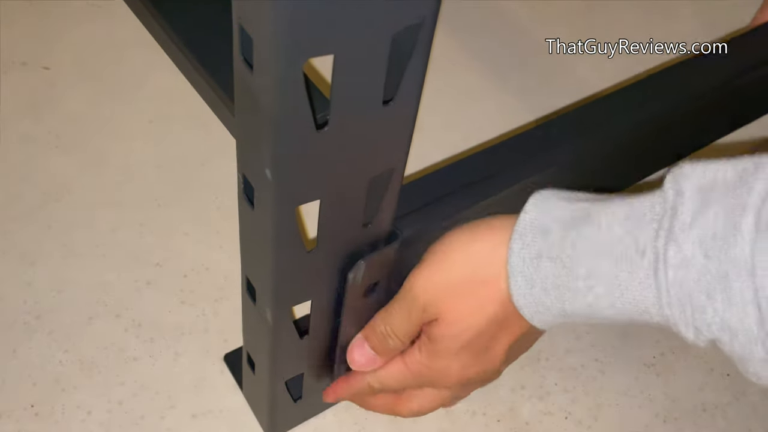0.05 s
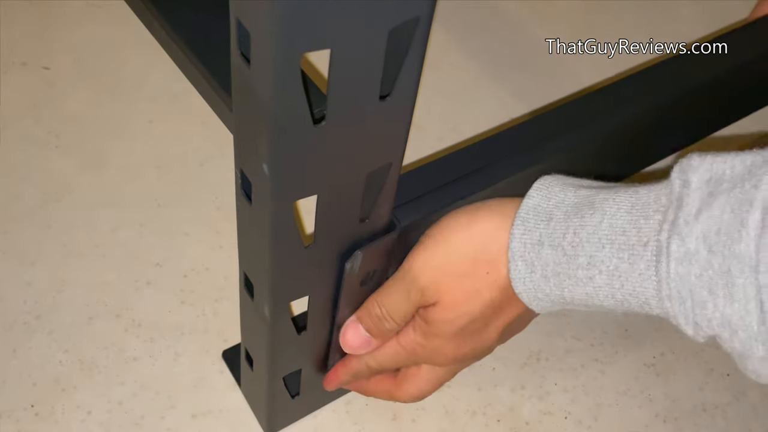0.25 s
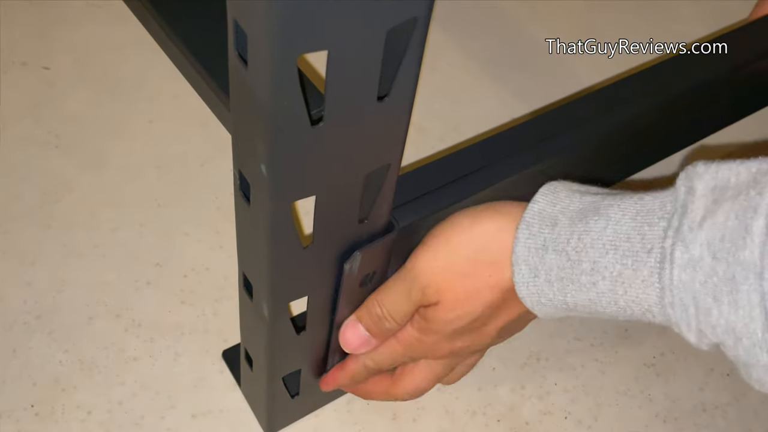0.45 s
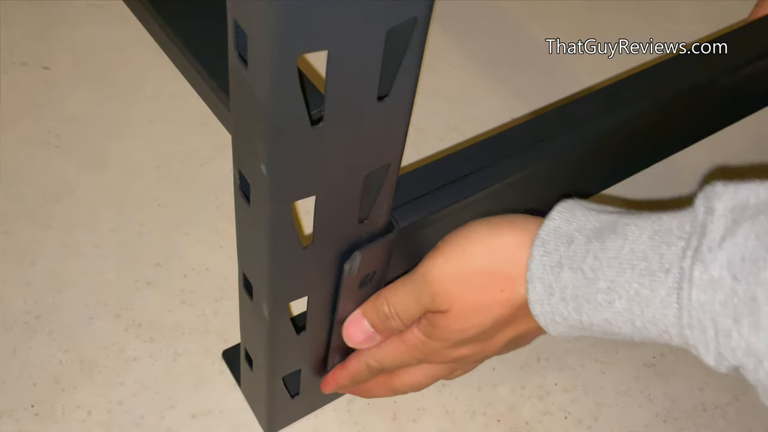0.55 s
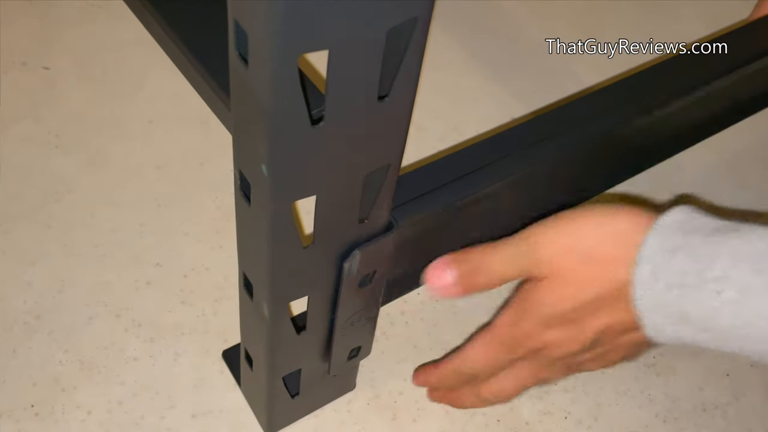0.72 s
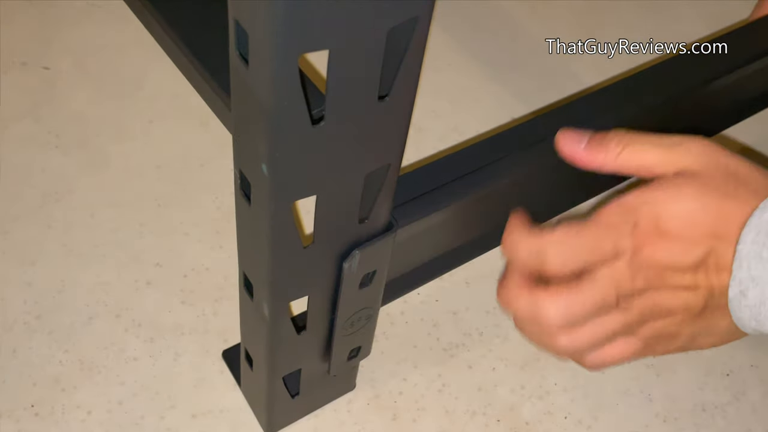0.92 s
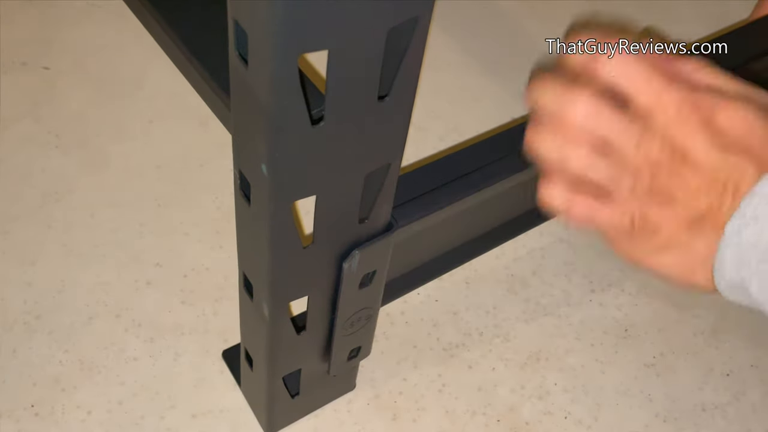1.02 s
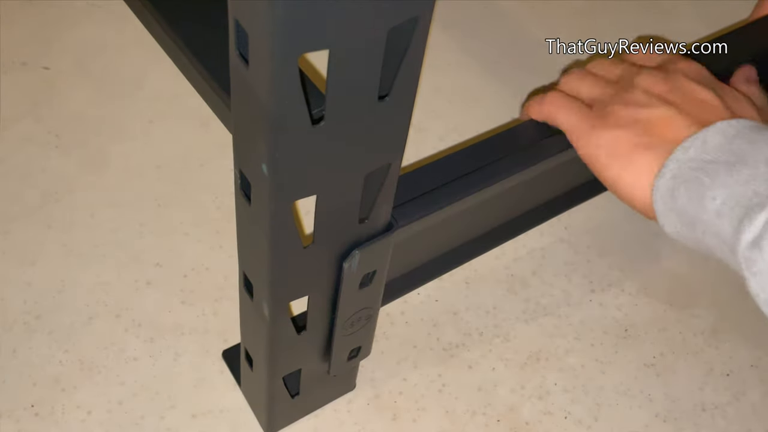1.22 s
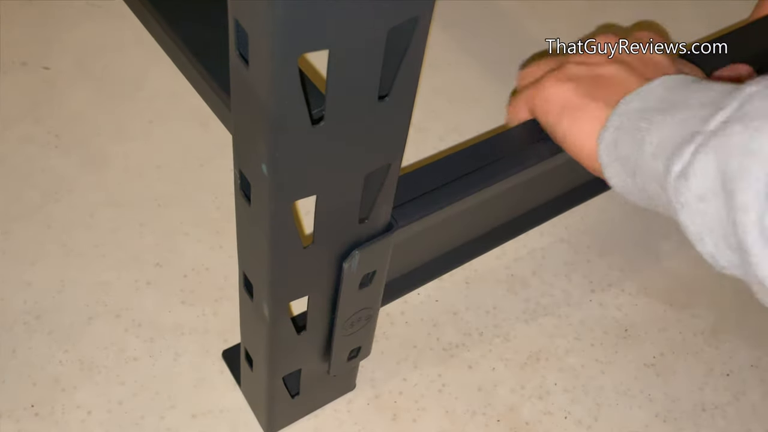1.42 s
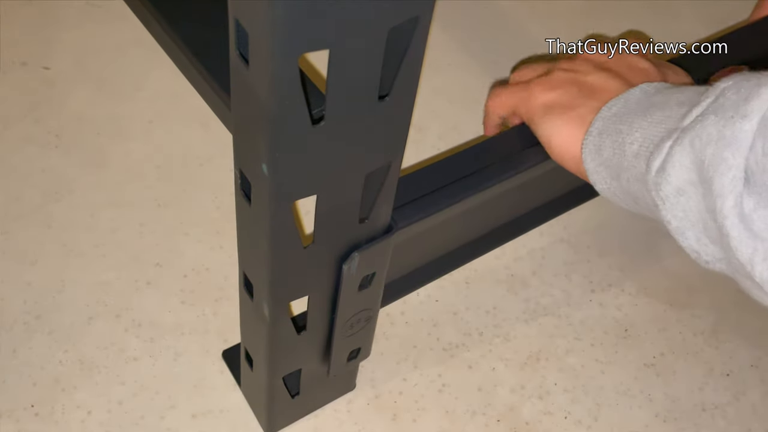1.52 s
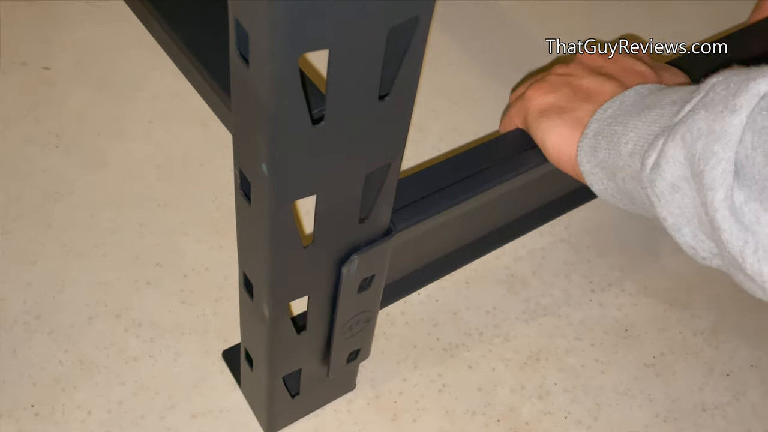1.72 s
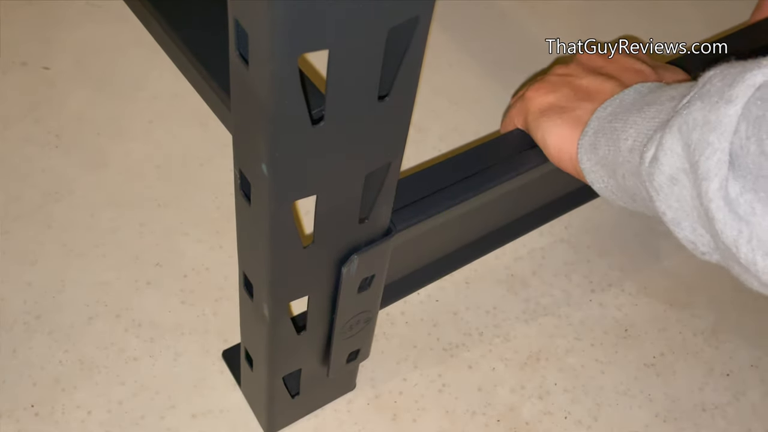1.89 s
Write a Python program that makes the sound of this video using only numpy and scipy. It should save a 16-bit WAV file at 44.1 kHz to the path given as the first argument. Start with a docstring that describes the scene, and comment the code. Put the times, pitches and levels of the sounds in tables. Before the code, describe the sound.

One loud metal clang from a steel rack, ringing out as a hand settles on it.

```python
"""A steel shelf beam clangs as a hand knocks it into its upright in a garage: a few strong, beating
modes ring over hundreds of weaker ones from the thin-walled rack, and the joint cracks and chatters.
While the clang rings on, the hand lands on the beam and leans on it, a sleeve rustles and the rack
booms softly. A faint rumble and the echo of the garage lie behind."""
import sys
import numpy as np
from scipy import signal
from scipy.fft import rfft, irfft
from scipy.io import wavfile
from scipy.ndimage import uniform_filter1d

SR = 44100
rng = np.random.default_rng(int(sys.argv[2]) if len(sys.argv) > 2 else 0)


def store_pcm(level_fs):
    """Save levels as 16-bit WAV."""
    pcm = np.round(np.clip(level_fs, -1, 1) * 32767).astype(np.int16)
    wavfile.write(sys.argv[1], SR, np.atleast_2d(pcm).T)


N = 85995
T = np.arange(N) / SR
F = np.maximum(np.fft.rfftfreq(N, 1 / SR), 1)
KNOCK_S = 0.2063
WIDTH_HZ = 260  # channels drift apart above this


def undb(db):
    """Decibels to gain."""
    return 10 ** (np.asarray(db) / 20)


def at(table, hz, column=1):
    """Table column interpolated over log frequency."""
    rows = np.array(table, float)
    return np.interp(np.log(hz), np.log(rows[:, 0]), rows[:, column])


def pan(db):
    """Stereo gains for an L-R level difference."""
    return undb(np.array([[db], [-db]]) / 2)


def decay(start_s, t60_s):
    """Exponential decay from a start time."""
    return (T >= start_s) * np.exp(-np.log(1000) * np.maximum(T - start_s, 0) / t60_s)


def swell(peak_s, rise_s, fall_s):
    """Asymmetric Gaussian envelope."""
    return np.exp(-((T - peak_s) / np.where(T < peak_s, rise_s, fall_s)) ** 2)


def noise(colour, width=0.91):
    """Coloured stereo noise, rms 1, near mono in the bass."""
    mid, side = rfft(rng.standard_normal((2, N)))
    stereo = mid + width * F / (F + WIDTH_HZ) * side * np.array([[1], [-1]])
    x = irfft(stereo * undb(at(colour, F)), N)
    return x / x.std()


def convolve(x, response):
    """Per-channel convolution, cut to N."""
    return signal.fftconvolve(x, response, axes=1)[:, :N]


def ring(hz, t60_s, spread_rad):
    """One struck mode: a damped complex wave with random L-R phase."""
    t = T[:int(min(t60_s * SR, N))]
    phase = 2 * np.pi * rng.random() + spread_rad * rng.standard_normal() * np.array([[1], [-1]]) / 2
    return np.exp(1j * phase) * np.exp((2j * np.pi * hz - np.log(1000) / t60_s) * t)


# Beam modes: f/Hz, level/dB, t60/s, L-R/dB, partner offset/Hz, partner ratio (negative: antiphase)
BEAM_MODES = [(139.46, -42.5, 1.7, -3.5, 4.5, 1.4), (549.4, -40.5, 1.61, -3.5, 6.5, .5),
              (594, -38.5, 0.73, 1, 9, 0.24), (757, -52, 2.54, -14, 4, 0.62),
              (839.3, -39, 1.51, -12, 4.5, -0.28), (861, -31.5, 0.78, 2, 7.5, 1.5),
              (924, -46.5, 2.9, 8, 3.5, -1.3), (1026, -41.5, 2.3, 12, -5, 0.79),
              (1112.6, -31, 3.1, 5, -3.5, .9), (1166, -45.5, 3.36, 4, 7, 0.53),
              (1385, -50, 3.6, -2, 5.5, -.9), (1557, -52, 3.5, 9, 9.5, 0.093),
              (1601, -41.5, 2.06, 5, 2.5, -.9), (1720, -44.5, 1.54, 3, -4.5, 1),
              (2141, -44, 1.2, -1, -30.5, 1.4), (2673, -41, 0.94, 1, 9, 1.7),
              (3021, -42.5, .55, -8, 18, -0.16)]


def beam(partner_t60_ratio=0.57):
    """Strong beam modes build up, waver and beat, each against a shorter-lived partner."""
    tones = np.zeros((2, N))
    for hz, db, t60, pan_db, beat_hz, partner in BEAM_MODES:
        build_s = 0.027 * (t60 / 2.5) ** 2  # brief modes speak at once
        build = 1 - np.exp(-T / build_s)
        beat_t60 = t60 * partner_t60_ratio / (1 - partner_t60_ratio)
        beating = 1 + partner * np.exp(2j * np.pi * beat_hz * T) * decay(0, beat_t60)
        wave = ring(hz, t60, spread_rad=1.264)
        n = wave.shape[1]
        envelope = (build * beating * waver())[:, :n]
        tones[:, :n] += undb(db) * pan(pan_db) * (wave * envelope).imag
    return tones


def waver(depth=0.24, corner_hz=25, knots_per_s=40):
    """Slow random drift of a tone's level and phase, per channel."""
    spectrum = rfft(rng.standard_normal((2, 2, int(N / SR * knots_per_s))))
    hz = np.arange(spectrum.shape[-1]) * SR / N
    real, imag = irfft(spectrum / (1 + (hz / corner_hz) ** 2), N)
    return 1 + depth * (real + 1j * imag) / real.std()


def knock_and_damp(tones, loss_db_per_s=2.5):
    """Tones start at the knock and decay faster once the palm lies on the beam."""
    struck = np.pad(tones, ((0, 0), (int(KNOCK_S * SR), 0)))[:, :N]
    palm_s = PALM_CONTACTS[-1][0]
    return struck * undb(-loss_db_per_s * np.maximum(T - palm_s, 0))


# Wall mode envelope: f/Hz, relative level per kHz/dB, t60/s
WALL_MODES = [(181.6, -34.5, 2.9), (357, -38.5, 2.18), (713, -32, 1.47), (1050, -23, 1.16),
              (1450, -34, 1.55), (2270, -30, 0.87), (3404, -28, 0.58), (3420, -43.5, 0.72),
              (5280, -34.5, 0.53), (5630, -48, 0.37), (7180, -41, 0.37), (8047, -81.5, 0.93)]


def rack_walls(count=900):
    """Dense modes of the thin steel walls, driven by the blow."""
    edges_hz = np.linspace(np.sqrt(WALL_MODES[0][0]), np.sqrt(WALL_MODES[-1][0]), count + 1) ** 2
    modes = np.zeros((2, N))
    for low_hz, gap_hz in zip(edges_hz, np.diff(edges_hz)):
        hz = low_hz + gap_hz * rng.random()
        life, side = rng.standard_normal(size=2)
        width = hz / (hz + WIDTH_HZ)
        gain = undb(at(WALL_MODES, hz)) * np.sqrt(gap_hz / 1000)
        t60 = at(WALL_MODES, hz, column=2) * np.exp(0.16 * life)
        wave = ring(hz, t60, spread_rad=2.3 * width).imag
        modes[:, :wave.shape[1]] += gain * pan(width * (7 + 4 * side)) * wave
    return undb(-0.5) * convolve(modes, blow())


def blow(chatter_db=-9.5, mean_delay_s=0.0063):
    """Unit-energy force: the knock, then six impulses of joint chatter."""
    force = np.zeros((1, N))
    force[0, int(KNOCK_S * SR)] = 1
    for delay_s, size in zip(rng.exponential(mean_delay_s, size=6), rng.standard_normal(size=6)):
        force[0, int((KNOCK_S + delay_s) * SR)] += size * undb(chatter_db)
    return force / np.sqrt(np.sum(force ** 2))


# Whole-rack modes: f/Hz, level/dB, t60/s
SWAY_MODES = [(56.5, -65.5, 6.1), (207.1, -48.5, 4.35), (279.3, -56.5, 3.3), (330.4, -51.5, 2.56),
              (423.5, -50.5, 2.92)]


def rack_sway():
    """The whole rack sways in low, long-lived modes."""
    tones = np.zeros((2, N))
    for hz, db, t60 in SWAY_MODES:
        wave = ring(hz, t60, spread_rad=0).imag
        tones[:, :wave.shape[1]] += undb(db) * wave
    return tones


# Crack spectrum: f/Hz, relative level/dB
CRACK_SPECTRUM = [(50, -18), (100, 14.5), (300, 0.5), (900, 2.5), (3000, -5.5), (6500, -9), (8500, -27.5),
                  (10500, -16), (15000, -26.5)]
# Hiss spectrum of snap, ticks and rubs: f/Hz, relative level/dB
HISS_SPECTRUM = [(2000, -51.5), (6500, -1), (8600, -15), (10000, 2.5), (13300, 3), (15500, 1.5)]
# Settling ticks: t/s, level/dB
JOINT_TICKS = [(0.411, -60.5), (0.465, -57.5), (0.557, -60), (1.565, -50.5)]


def joint():
    """Steel hits steel with a crack and a bright snap; the joint ticks as it settles."""
    crack = undb(-26.5) * noise(CRACK_SPECTRUM, width=0.49) * decay(KNOCK_S, t60_s=0.27) * pan(0.99)
    snap = undb(-45) * decay(KNOCK_S, t60_s=0.16)
    ticks = sum(undb(db) * decay(s, t60_s=0.036) for s, db in JOINT_TICKS)
    return crack + noise(HISS_SPECTRUM, width=0.41) * (snap + ticks)


# Palm contacts: t/s, level/dB
PALM_CONTACTS = [(1.249, -54.5), (1.255, -48.5)]
# Pat spectrum: f/Hz, relative level/dB
PALM_SPECTRUM = [(50, -19), (115, 4.5), (220, -5), (370, 1), (700, 1), (1000, -12), (2500, -17.5),
                 (4800, -19.5), (7000, -55)]


def palm():
    """The palm lands on the beam with a dull pat."""
    return noise(PALM_SPECTRUM) * sum(undb(db) * decay(s, t60_s=0.14) for s, db in PALM_CONTACTS)


# Rack booms: peak t/s, rise/s, fall/s, f/Hz, level/dB
RACK_BOOMS = [(1.297, .012, .04, 115, -53), (1.605, .035, .22, 102, -51), (1.63, .03, .05, 290, -58),
              (1.78, .13, .1, 56, -51.5)]


def rack_booms():
    """Low tones swell under the weight of the hand."""
    return sum(undb(db) * swell(s, rise, fall) * np.sin(2 * np.pi * (hz * T + rng.random()))
               for s, rise, fall, hz, db in RACK_BOOMS)


# Rubs: peak t/s, rise/s, fall/s, cloth level/dB, hiss level/dB
SLEEVE_RUBS = [(0.871, 0.079, 0.13, -65, -67), (1.264, 0.024, 0.036, -66, -88),
               (1.26, 0.097, 0.077, -81.5, -67.5), (1.45, 0.1, 0.083, -60, -63),
               (1.57, 0.012, 0.059, -60.5, -55.5), (1.632, 0.05, 0.085, -60.5, -75)]
# Cloth spectrum: f/Hz, relative level/dB
CLOTH_SPECTRUM = [(200, -6), (900, -3), (2700, -7), (4500, -11), (5700, -14), (7000, -11), (9000, -43.5),
                  (15000, -45)]


def sleeve(grain_db=1):
    """Cloth and skin rub in short grainy strokes."""
    grain = uniform_filter1d(rng.standard_normal(N), size=160)
    cloth, hiss = noise(CLOTH_SPECTRUM), noise(HISS_SPECTRUM, width=0.9)
    strokes = sum(swell(s, rise, fall) * (undb(cloth_db) * cloth + undb(hiss_db) * hiss)
                  for s, rise, fall, cloth_db, hiss_db in SLEEVE_RUBS)
    return strokes * undb(grain_db * grain / grain.std())


# Rumble spectrum: f/Hz, relative level/dB
RUMBLE_SPECTRUM = [(25, -7.5), (42, -10), (56, 9), (80, -2), (210, -5), (300, -13), (600, -22.5),
                   (4000, -36.5), (8000, -54.5), (13000, -36), (16000, -50)]
# Rumble envelope: t/s, level/dB
RUMBLE_ENVELOPE = [(.18, -110), (.22, -49), (.8, -57), (1.2, -56.5), (1.47, -62.5), (1.75, -56.5),
                   (1.95, -67.5)]


def rumble():
    """Faint low noise rises at the knock and ebbs unevenly."""
    times_s, levels_db = np.array(RUMBLE_ENVELOPE).T
    return noise(RUMBLE_SPECTRUM) * undb(np.interp(T, times_s, levels_db))


# Reverberation time: f/Hz, t60/s
GARAGE_T60 = [(60, 1.1), (250, 1.5), (1000, 0.74), (3000, 0.94), (7000, 0.24), (14000, 0.59)]


def garage(predelay_s=0.0078, lowest_hz=62.5):
    """Diffuse room response in octave bands, shorter in the treble."""
    white = rfft(noise([(20, 0), (20000, 0)]))
    octave = np.clip(np.log2(F / lowest_hz), 0, 8)
    response = np.zeros((2, N))
    for k in range(9):
        t60 = at(GARAGE_T60, lowest_hz * 2 ** k)
        band = irfft(white * np.maximum(1 - abs(octave - k), 0), N)
        energy_norm = np.sqrt(2 * np.log(1000) / t60 / SR)
        response += band * decay(predelay_s, t60) * energy_norm
    return response


def scene():
    """Impacts with their garage echo, plus sleeve, booms and rumble."""
    clang = knock_and_damp(rack_sway() + beam())
    impacts = [(clang, -13), (rack_walls(), -7), (joint(), -7), (palm(), -1)]
    echo = convolve(sum(x * undb(send_db) for x, send_db in impacts), garage())
    return sum(x for x, _ in impacts) + echo + sleeve() + rack_booms() + rumble()


def record(dry):
    """Band limit: 38 Hz to 15.4 kHz."""
    highpass = signal.butter(2, 38, "high", fs=SR, output="sos")
    lowpass = signal.ellip(8, 0.2, 70, 15400, fs=SR, output="sos")
    return signal.sosfilt(lowpass, signal.sosfilt(highpass, dry))


dry = scene()
out = record(dry)
store_pcm(out)
```